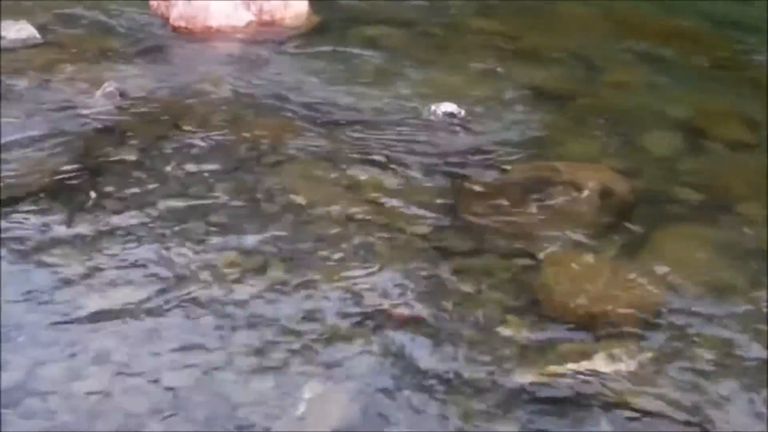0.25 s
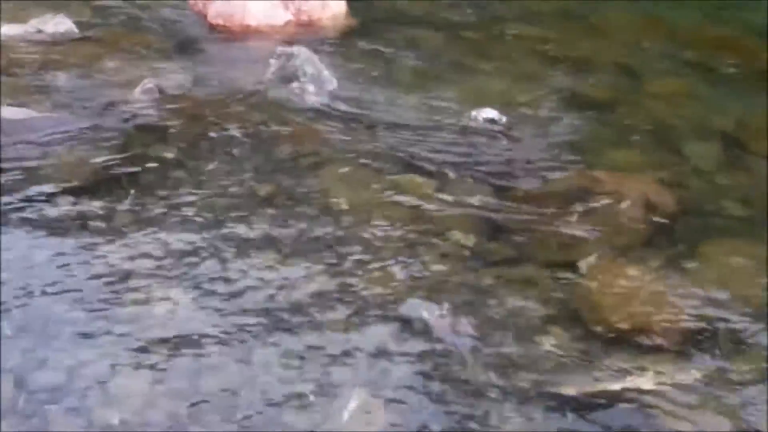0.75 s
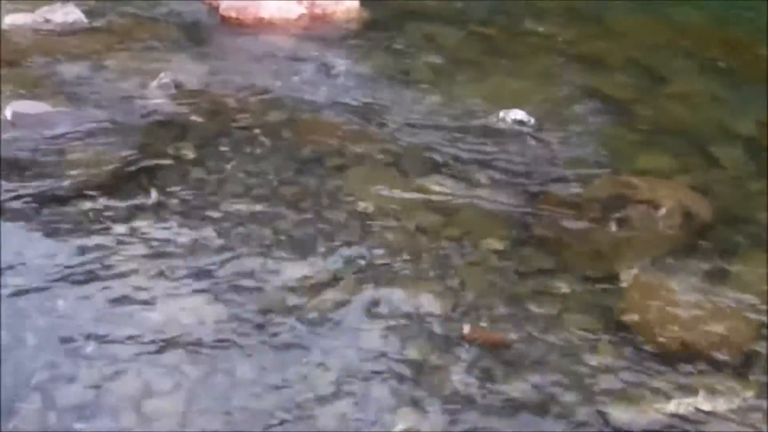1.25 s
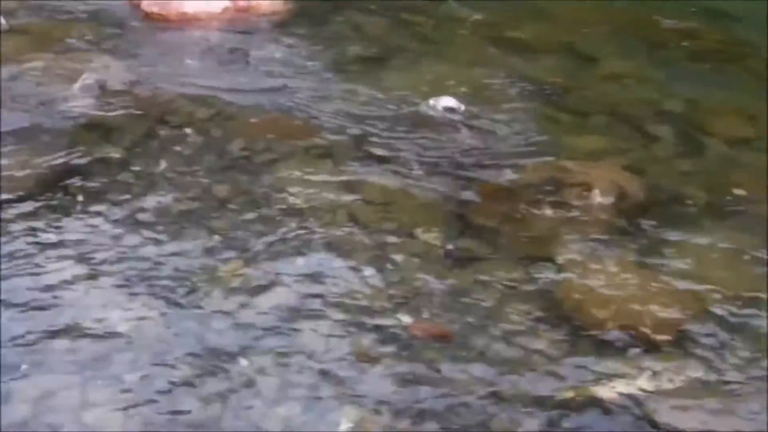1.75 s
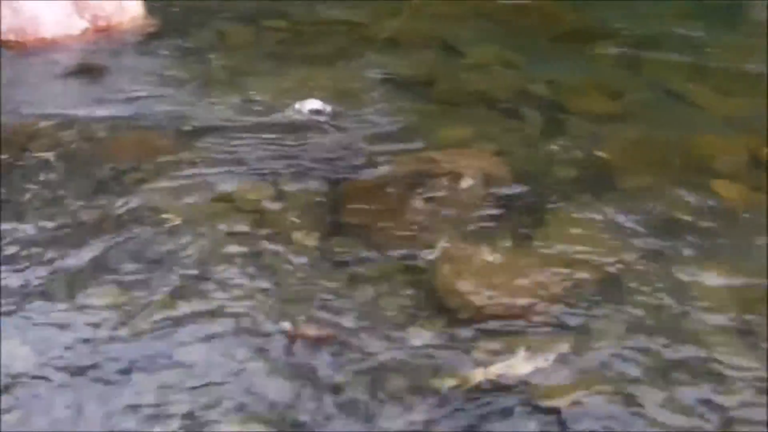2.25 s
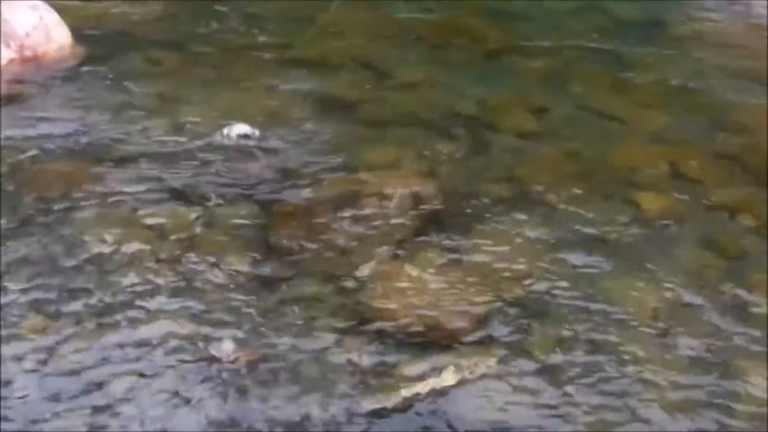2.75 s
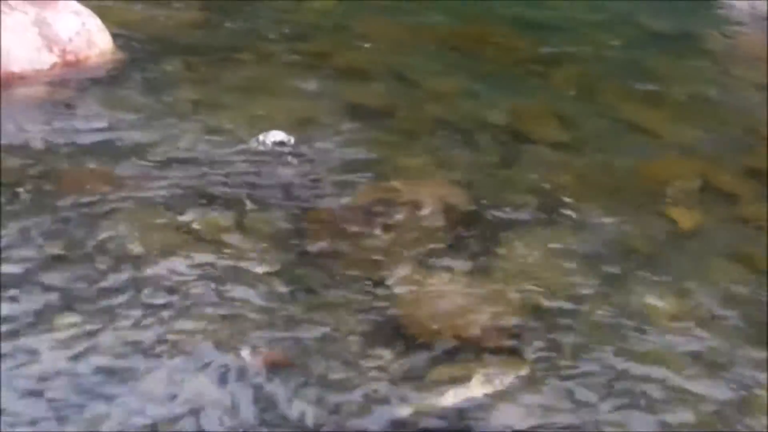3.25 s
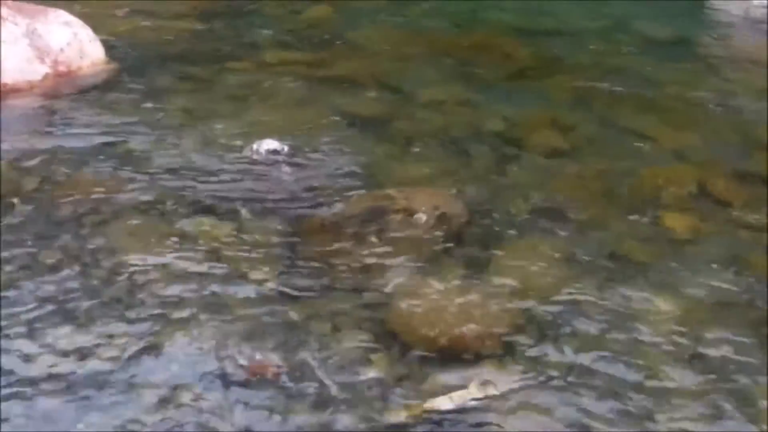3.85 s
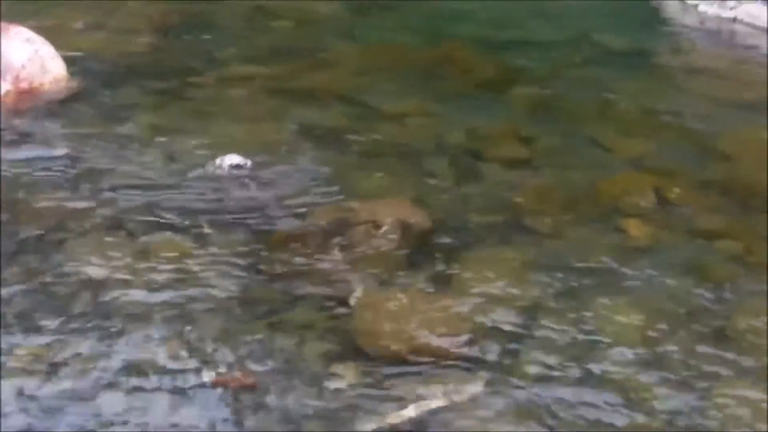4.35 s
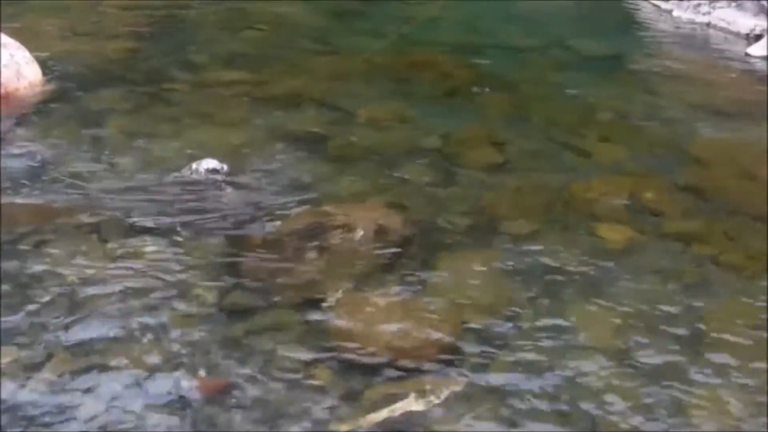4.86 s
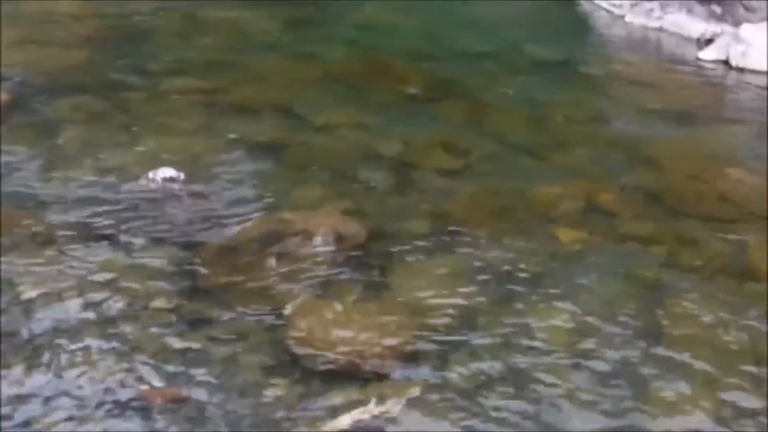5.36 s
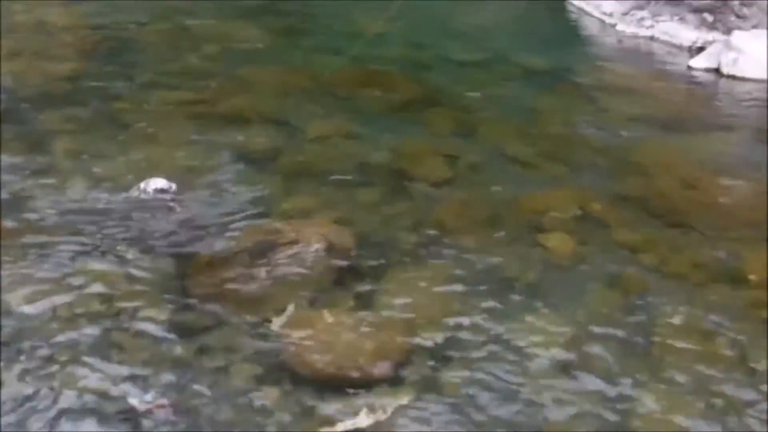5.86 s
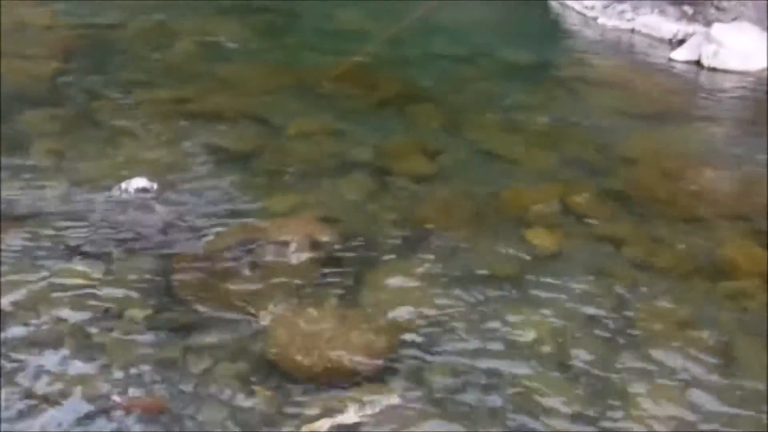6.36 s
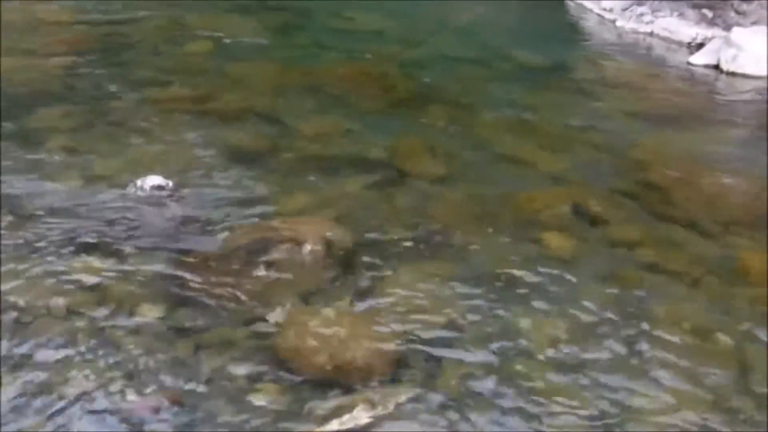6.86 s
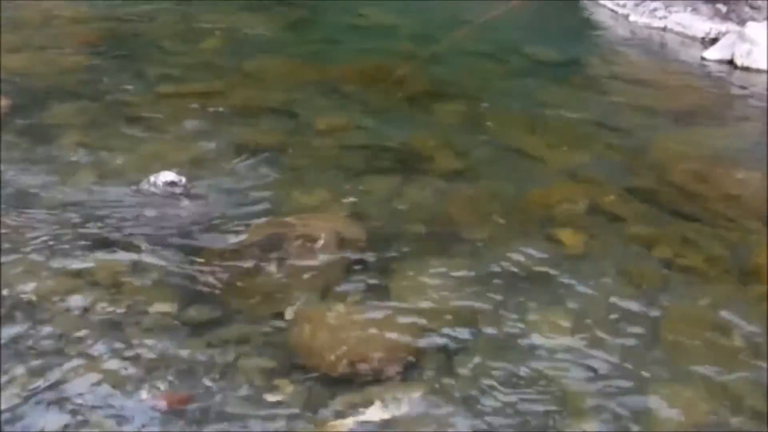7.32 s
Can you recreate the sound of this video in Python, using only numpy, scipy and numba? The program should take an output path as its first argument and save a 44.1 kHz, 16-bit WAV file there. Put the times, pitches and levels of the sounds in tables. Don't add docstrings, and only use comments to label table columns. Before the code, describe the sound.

A small splash and bright droplets over constant river hiss, followed by short raspy fishing-line zips and one loud dry crack on the rod.

```python
import sys
import numpy as np
from scipy import signal
from scipy.fft import rfft, irfft, dct
from scipy.io import wavfile
from scipy.ndimage import uniform_filter1d
from numba import njit

SR = 44100
rng = np.random.default_rng(int(sys.argv[2]) if len(sys.argv) > 2 else 0)


def unload_wav(signal):
    wavfile.write(
        sys.argv[1],
        SR,
        np.round(np.clip(np.atleast_2d(signal).T, -1, 1) * 32767).astype(np.int16),
    )


def invert_db(level):
    return 10 ** (np.asarray(level, dtype=float) / 20)


N = 334716
T = np.arange(N) / SR

# start_s, hardest_s, stop_s, peak_db, catch_db (against the peak)
STRIPS = [
    (1.86, 1.89, 2.05, -54, -6),
    (2.01, 2.044, 2.17, -53, -2),
    (2.317, 2.375, 2.48, -42.5, -2),
    (2.444, 2.633, 2.792, -31.5, -9),
    (2.948, 3.043, 3.158, -33, -8.5),
    (3.888, 3.98, 4.07, -35.5, -10.5),
    (4.932, 5.055, 5.114, -30.5, -9.5),
    (5.878, 6.036, 6.088, -41, -6.5),
]
# low_db, middle_db, top_db, tip_db (against the main rings),
# lean_db (per rank, towards the upper rings of the low, middle and tip sets)
GRIPS = [
    (-11, -1, -5, 0, .1),
    (-3, -9, -2, -2, .1),
    (2.5, -2, -16, -9, 2),
    (-5, -6, -12.5, -5.5, 1),
    (-3, -.6, -9, -1.5, 1),
    (-1.5, 1.5, -10, -.6, -0.5),
    (-2.5, -8, -9.5, -5, -1),
    (1, -0.5, -6, 1, .8),
]
# pitch_hz, width_hz, group (0 main, 1 low, 2 middle, 3 top, 4 tip)
RINGS = [(2900, 1100, 0), (4110, 351, 1), (4610, 351, 1), (5090, 401, 1), (6060, 501, 2), (6590, 301, 2),
         (7210, 401, 2), (8210, 401, 0), (9110, 321, 0), (9910, 401, 4), (10440, 401, 4), (11210, 601, 4),
         (12210, 701, 3), (13410, 701, 3), (14710, 901, 3)]
RING_DB = (-17, -3.5, -2.5, -5, -5.5, -1, -5, -6.5, -0.5, -3, -5.5, -12.5, -16, -19, -20)
SLACK_GAIN = (0.6, 0.34, -.3, -0.14)
# start_s, hold_s, gulp_db, slap_db (against the gulp),
# lead_s (thrown water ahead of the bubbles)
SURGES = [
    (0.733, 0.0047, -33, -0.5, 0.01),
    (0.811, 0.049, -34.5, -12, -.018),
]
# start_s, peak_db, pitch_hz
PLINKS = [(0.326, -24, 4130), (0.499, -34, 590), (0.734, -17, 1710), (0.74, -20.5, 1470),
          (0.747, -27, 1450), (0.811, -26, 1650), (0.823, -23, 1370), (0.835, -21.5, 1630),
          (0.844, -18.5, 1670), (0.857, -29, 1011), (0.865, -33, 1180), (0.873, -22, 3130),
          (0.883, -30, 1820), (0.909, -24, 2550), (0.949, -27, 1870), (1.019, -35.5, 730),
          (1.081, -27, 2520), (1.299, -35, 590), (4.718, -27, 1130)]
# start_s, peak_db, pitch_hz, crack_db (broad noise against the ring)
DROPS = [(0.4428, -24.5, 6000, 2), (0.5174, -38, 6530, -4), (0.583, -20.5, 9050, -15),
         (0.658, -35, 6190, -4), (0.72, -26, 5600, -4), (0.736, -20, 3150, -2), (0.829, -27, 4750, 0),
         (0.8454, -32, 6950, -4), (0.8715, -21, 3080, 0), (0.9114, -32, 3330, -4), (0.9284, -29, 6080, -4),
         (0.945, -28, 5500, -9), (0.9604, -26, 6840, -4), (0.9897, -22, 10000, 12), (1.0068, -22, 6020, -2),
         (1.0127, -22.5, 8300, -9), (1.0824, -33, 5310, 1), (1.0892, -15, 8800, 6), (1.2124, -28, 6710, 14),
         (1.5196, -28, 3220, 9), (1.9175, -32, 5850, -4), (2.0714, -31, 5900, -4), (3.1602, -34, 7060, -4),
         (4.1754, -30, 6550, -4), (6.0674, -26, 6540, -2), (6.133, -35, 5960, -4), (6.921, -28, 6780, -6),
         (6.9591, -28, 4220, 12), (7.4065, -29, 4880, 1), (7.458, -29, 5890, 3)]
# start_s, peak_db,
# pitch_hz, t60_s (time to fade by 60 dB), upper_hz
SLAPS = [(5.034, -30, 2330, .04, 4500), (5.06, -28, 2230, 0.047, 4600), (5.116, -21, 8500, .016, 13300),
         (5.121, -24, 5000, .004, 9000), (5.1237, -0.5, 10300, 0.0025, 10800),
         (5.1272, -15, 9100, .003, 12900), (5.13, -21, 8750, 0.019, 10100),
         (5.1445, -19, 9900, .003, 12000), (5.149, -17, 8900, 0.016, 12030),
         (5.465, -17.5, 8940, 0.022, 11860), (5.476, -17, 7000, 0.012, 8100),
         (5.4804, -21, 7000, 0.014, 8900), (5.4917, -26, 9340, 0.018, 13300),
         (5.5196, -22, 7450, 0.0085, 8950)]
# pitch_hz, level_db (per Hz)
RIVER_COLOUR = [(15, -52), (25, -45), (119, -22.5), (341, -5), (724, -1.5), (898, -1.5), (1180, -1),
                (1910, -3), (2180, -4.5), (4280, -9), (6770, -8.5), (9350, -12), (12600, -22),
                (15600, -25.5)]
# time_s, level_db
FLOW = [
    (0.0, 0),
    (1.0, 2),
    (1.25, 0.5),
    (7.36, 0.5),
    (7.59, 0.5),
]
# time_s, level_db, pitch_hz
PUFFS = [
    (4.7, -71, 40),
    (6.25, -65, 38),
]
# pitch_hz, level_db
WHINE = [
    (13690, -78),
    (15369, -74),
]
# time_s, lost (share of its tones, 0-1)
THIN_MOMENTS = [(0.82, 0.93), (1.035, 0.92), (1.143, 0.87), (1.335, 0.86), (1.951, 0.79), (2.546, 0.91),
                (2.759, 0.88), (3.829, .92), (3.886, 0.86), (4.023, 0.85), (4.443, .88), (5.174, 0.94),
                (5.192, 0.93), (6.086, 0.83), (7.47, 0.85), (7.491, 0.87)]


def set_rms(x, db):
    return x * invert_db(db) / np.sqrt(np.mean(x ** 2))


def resonance(x, hz, width_hz):
    hz = min(hz, .45 * SR)
    return signal.lfilter(*signal.iirpeak(hz, hz / width_hz, SR), x)


def steep(x, hz, width_hz):
    return resonance(resonance(x, hz, width_hz), hz, width_hz)


def walk(rate):
    k = int(SR / rate)
    steps = np.repeat(rng.standard_normal(N // k + 1), k)
    return 0.93 * uniform_filter1d(uniform_filter1d(steps, k), k)[:N]


@njit
def grains(start, hz, cycles, size, glide):
    out = np.zeros(N)
    for g in range(len(start)):
        step = 2 * np.pi * hz[g] / SR
        fade = np.exp(-hz[g] / cycles[g] / SR)
        phase, height = 0., size[g]
        end = min(N, start[g] + int(6 * cycles[g] * SR / hz[g]))
        for i in range(start[g], end):
            out[i] += height * np.sin(phase)
            phase += step
            height *= fade
            step = min(step * (1 + glide * step), 3.)
    return out


def scatter(count, low_hz, high_hz, cycles, spread_db, glide):
    chance = rng.random((count, 4)).T
    hz = low_hz * (high_hz / low_hz) ** chance[1]
    size = np.sqrt(hz) * invert_db(spread_db * np.minimum(-np.log(1 - chance[2]), 4.5))
    sound = grains((chance[0] * N).astype(np.int64), hz, cycles * (.5 + chance[3]), size, glide)
    rumble_cut = signal.butter(4, 0.88 * low_hz, "high", fs=SR, output="sos")
    return set_rms(signal.sosfilt(rumble_cut, sound), 0)


def surge(s, hold_s, fall_db_s):
    rise_db = 1100 * (T - s)
    fall_db = -fall_db_s * (T - s - hold_s)
    return invert_db(np.minimum(np.minimum(rise_db, fall_db), 0))


def line():
    limp_db, taut_db = -52, -33.5
    bite_s, let_go_s = 0.02, 0.017
    end_db = -7.5
    ticks = invert_db(1.6 * walk(900) + .6 * walk(120))
    rings = []
    for hz, width_hz, _ in RINGS:
        ring = steep(ticks * rng.standard_normal(N), hz, 1.5 * width_hz)
        rings.append(ring * invert_db(1.3 * walk(25) + 1.2 * walk(9)))
    rings = np.array(rings)
    member = np.round(np.array(RINGS)[:, 2]) == np.arange(5)[:, None]
    place = sum(m * (np.cumsum(m) - (m.sum() + 1) / 2) for m in member[[1, 2, 4]])
    out = np.zeros(N)
    for (start, hardest, stop, db, catch_db), (*grip_db, lean_db) in zip(STRIPS, GRIPS):
        on = slice(int(start * SR), int(stop * SR))
        t = T[on]
        taut = max((db - limp_db) / (taut_db - limp_db), .3)
        mix = member * invert_db(taut * np.array(RING_DB) + lean_db * place)
        main, *groups = [set_rms(g, 0) for g in mix @ rings[:, on]]
        pull_db = np.interp(t, [start, hardest, stop], [catch_db, 0, end_db])
        contact = np.clip(np.minimum((t - start) / bite_s, (stop - t) / let_go_s), 0, 1)
        others = sum(invert_db(g - k * pull_db) * ring for g, k, ring in zip(grip_db, SLACK_GAIN, groups))
        out[on] += contact * invert_db(db + pull_db) * (main + others)
    return out


def splash():
    gulp = scatter(count=7000, low_hz=622.0, high_hz=2917.0, cycles=8.2, spread_db=2.5, glide=0.0035)
    slap = scatter(count=30000, low_hz=2200.0, high_hz=6520.0, cycles=4.1, spread_db=3.0, glide=0.0031)
    spray = scatter(count=25000, low_hz=6000., high_hz=11200.0, cycles=2.2, spread_db=3.0, glide=0.0013)
    fall_db_s, rain_fall_db_s, rain_ends_s = 480, 28, 1.14
    rain_gate = np.clip((rain_ends_s - T) / .03, 0, 1)
    out = invert_db(-43) * surge(SURGES[0][0], 0, rain_fall_db_s) * rain_gate * (slap + spray)
    for s, hold_s, db, slap_db, lead_s in SURGES:
        water = invert_db(slap_db) * slap + invert_db(-7) * spray
        thrown = surge(s - lead_s, hold_s + lead_s, fall_db_s) * water
        out = out + invert_db(db) * (invert_db(-2.0) * surge(s, hold_s, fall_db_s) * gulp + thrown)
    return out


def plinks():
    s, db, hz = np.transpose(PLINKS)
    cycles = 6 + 0 * hz
    sound = grains((s * SR).astype(np.int64), hz, cycles, invert_db(db - 5.5), .0025)
    return signal.sosfilt(signal.butter(4, 420, "high", fs=SR, output="sos"), sound)


def taps(rows):
    size = 2048
    out, t = np.zeros(N + size), np.arange(size) / SR
    for s, db, hz, t60, upper_hz, crack_db in rows:
        t60 = max(t60, .001)
        burst = (t == 0) * 3 + rng.standard_normal(size) * np.exp(-np.log(1000) * t / (1.26 * t60))
        rings = steep(burst, hz, 14 / t60) + invert_db(-5) * steep(burst, upper_hz, 9 / t60)
        crack = steep(burst, 7200, 9100)
        hit = rings / np.max(np.abs(rings)) + invert_db(crack_db) * crack / np.max(np.abs(crack))
        out[int(s * SR):int(s * SR) + size] += invert_db(db) * hit / np.max(np.abs(hit))
    return out[:N]


def drops():
    t60_s, crown_hz = 0.0077, 7600
    return taps([(s, db, hz, t60_s, max(hz, crown_hz), crack_db) for s, db, hz, crack_db in DROPS])


def line_slaps():
    return taps([(s, db, hz, t60, upper_hz, -11.5 - .5 * db) for s, db, hz, t60, upper_hz in SLAPS])


def river():
    f = np.maximum(np.fft.rfftfreq(N, 1 / SR), 1)
    colour_hz, colour_db = np.transpose(RIVER_COLOUR)
    colour = invert_db(np.interp(np.log(f), np.log(colour_hz), colour_db))
    flow_db = np.interp(T, *np.transpose(FLOW))
    hiss, ripple = 0, walk(9)
    for octave in np.arange(4.5, 14.5, .5):
        share = np.cos(np.pi * np.clip(np.log2(f) - octave, -.5, .5))
        treble = np.clip((octave - 11) / 2, 0, 1)
        db = flow_db + 0.39 * treble * ripple + 0.75 * walk(2.85) + 0.86 * walk(14)
        hiss = hiss + invert_db(db) * irfft(rfft(rng.standard_normal(N)) * share * colour, N)
    bubbles = scatter(count=1500, low_hz=499.0, high_hz=2570.0, cycles=5.4, spread_db=1.5, glide=.003)
    fizz = scatter(count=3000, low_hz=2820.0, high_hz=9700.0, cycles=4.4, spread_db=7.0, glide=0.0035)
    return invert_db(-41) * (set_rms(hiss, 0) + invert_db(-16.0) * bubbles + invert_db(-17.0) * fizz)


def wind():
    out = np.zeros(N)
    for s, db, hz in PUFFS:
        out += invert_db(db) * np.exp(-((T - s) / 0.022) ** 2) * np.sin(2 * np.pi * hz * (T - s))
    return out


def whine():
    (low_hz, low_db), (high_hz, high_db) = WHINE
    chop = 1 + sum(g * np.cos(2 * np.pi * k * 58.7 * T) for k, g in enumerate([1.4, 1.4, 1.1, 0.99], start=1))
    low = invert_db(low_db) * np.sin(2 * np.pi * low_hz * T)
    high = invert_db(high_db) * chop * np.sin(2 * np.pi * high_hz * T)
    return invert_db(-1) * (low + high)


def scene():
    mono = line() + splash() + plinks() + drops() + line_slaps() + river() + wind() + whine()
    return np.tile(mono, (2, 1))


def thin_out(x):
    size = 1880
    out, window = x.copy(), np.sin(np.pi * np.arange(size) / size)
    for s, lost in THIN_MOMENTS:
        i = int(s * SR) - size // 2
        tones = dct(out[i:i + size] * window, norm="ortho")
        power = uniform_filter1d(tones ** 2, size=3)
        patches = uniform_filter1d(rng.random(size), size=12)
        height = patches ** 3 * power / uniform_filter1d(power, size=200) ** .8
        weak = height < np.quantile(height[:1340], np.clip(lost, 0, 1))
        change = np.where(weak, .92, -.7)
        out[i:i + size] -= window ** 2 * dct(tones * change, type=3, norm="ortho")
    return out


def roll_off(x):
    return signal.sosfilt(signal.butter(12, 16790, fs=SR, output="sos"), x)


def record(dry):
    top_cut = signal.ellip(11, .2, 60, 15730, fs=SR, output="sos")
    x = signal.sosfilt(top_cut, thin_out(dry[0]))
    mix = np.tile(np.clip(x, -1, 1), (2, 1))
    return roll_off(mix)


dry = scene()
out = record(dry)
unload_wav(out)
```